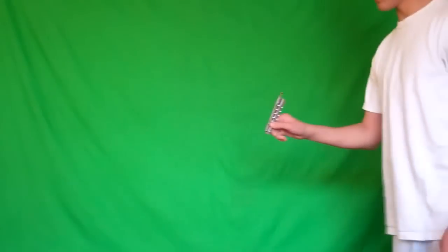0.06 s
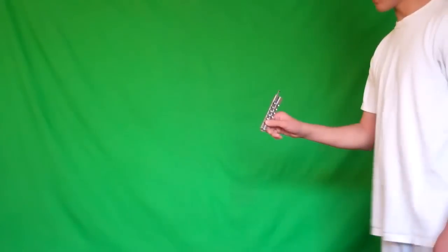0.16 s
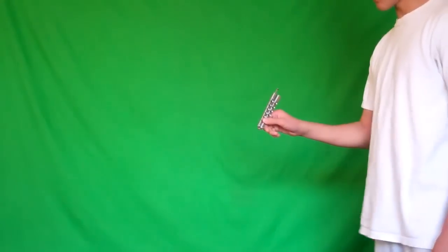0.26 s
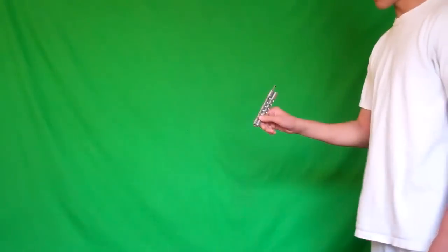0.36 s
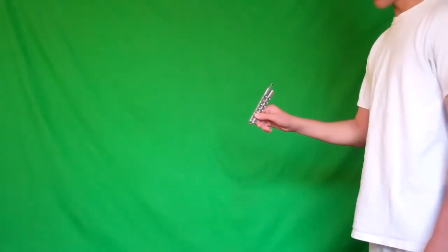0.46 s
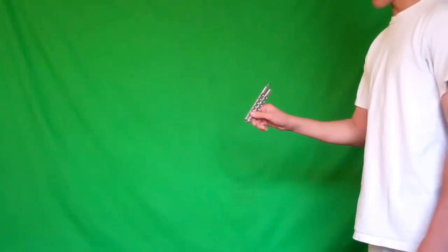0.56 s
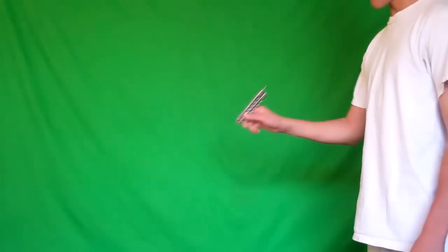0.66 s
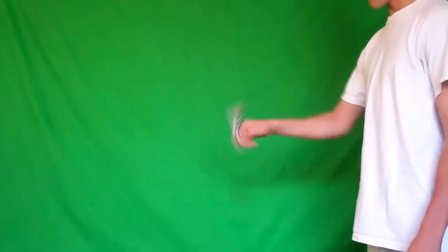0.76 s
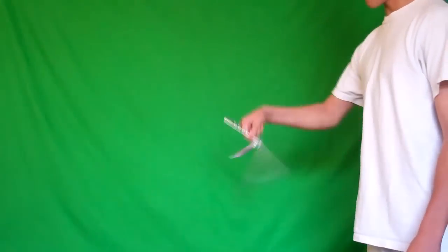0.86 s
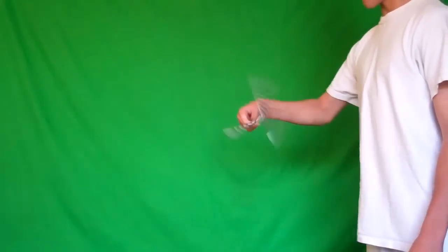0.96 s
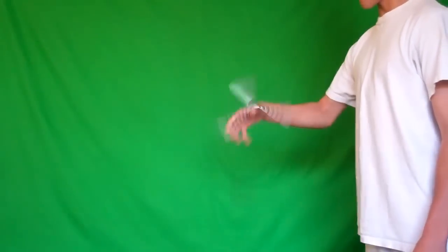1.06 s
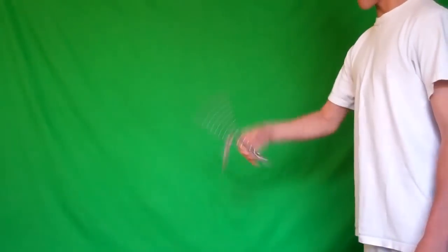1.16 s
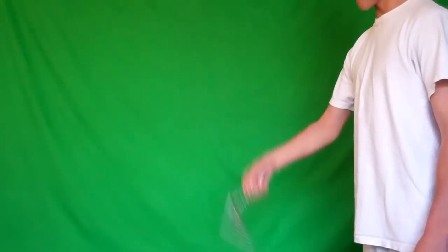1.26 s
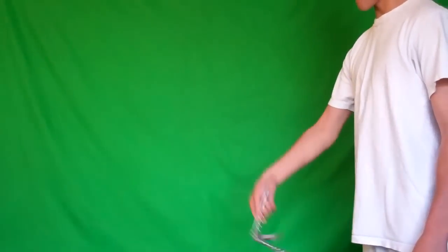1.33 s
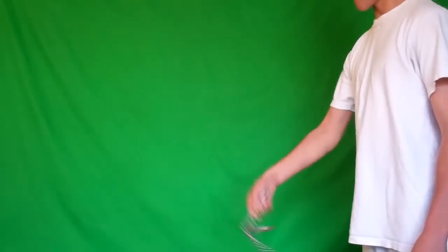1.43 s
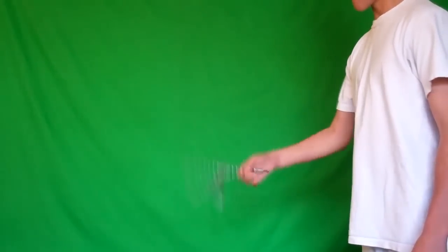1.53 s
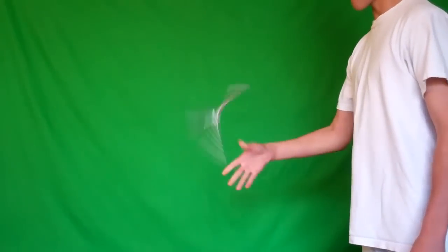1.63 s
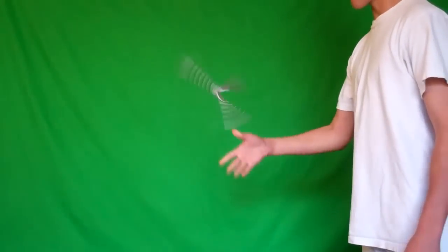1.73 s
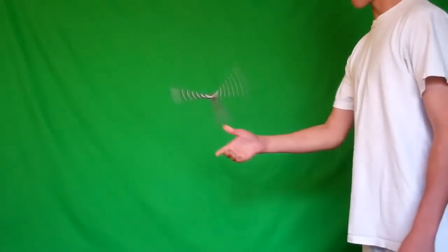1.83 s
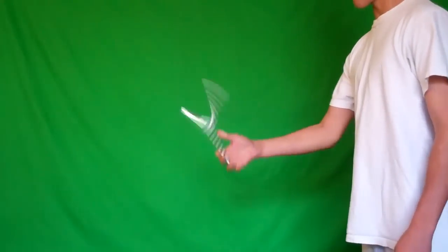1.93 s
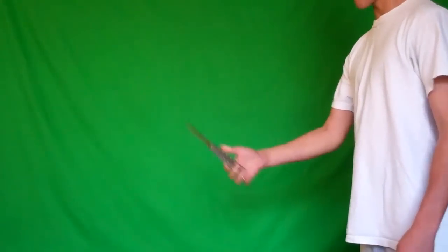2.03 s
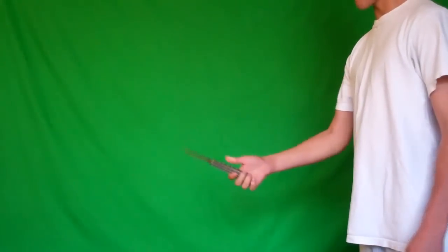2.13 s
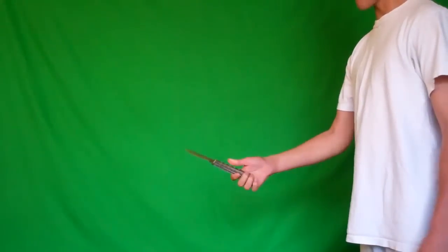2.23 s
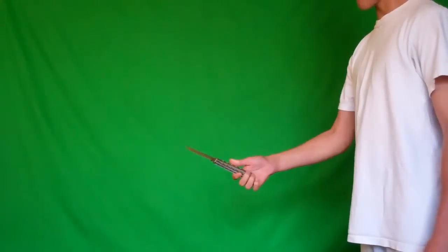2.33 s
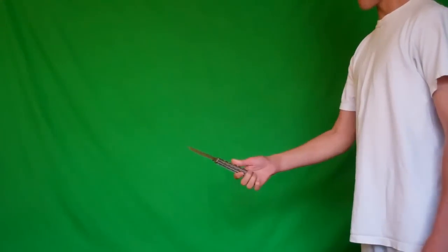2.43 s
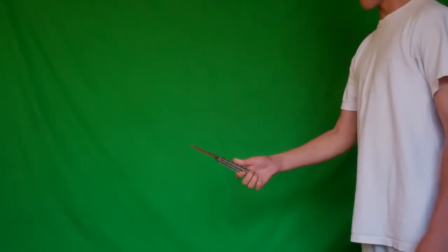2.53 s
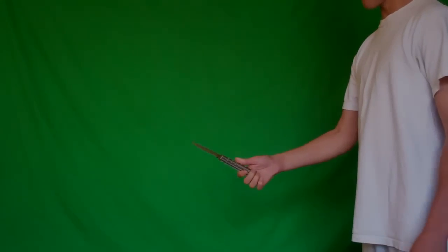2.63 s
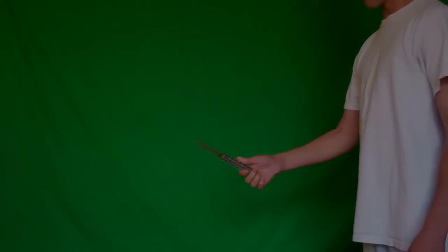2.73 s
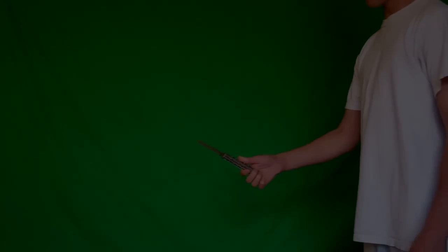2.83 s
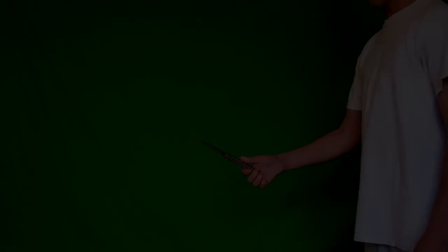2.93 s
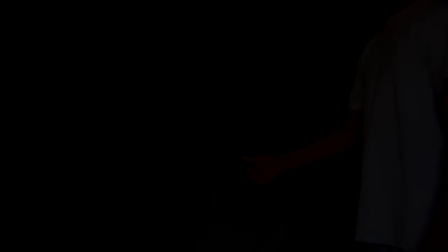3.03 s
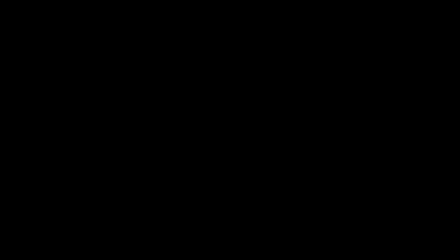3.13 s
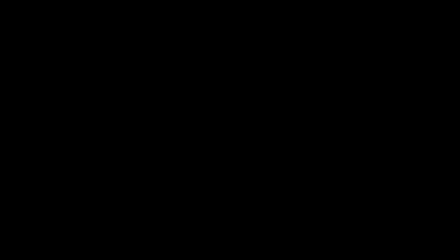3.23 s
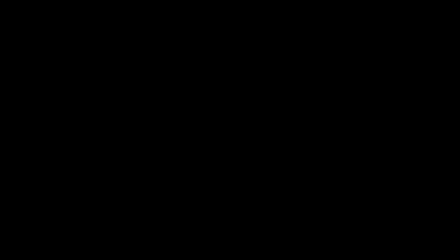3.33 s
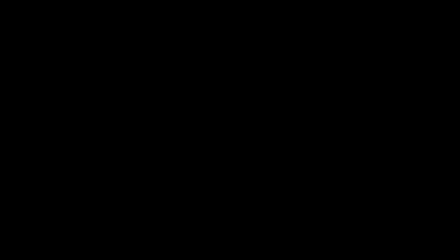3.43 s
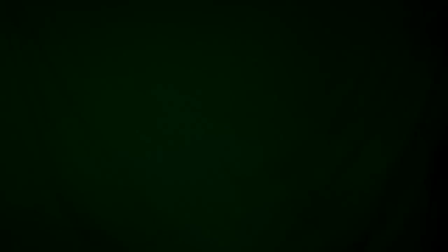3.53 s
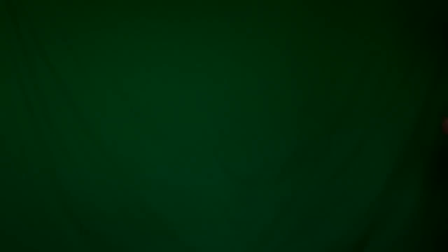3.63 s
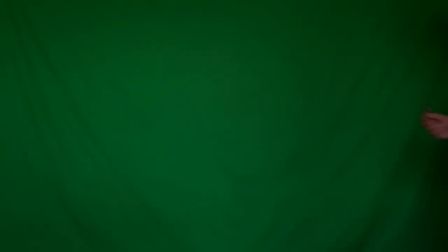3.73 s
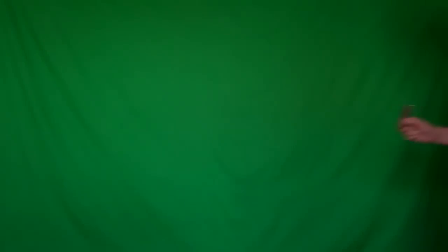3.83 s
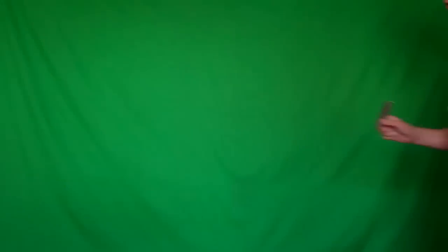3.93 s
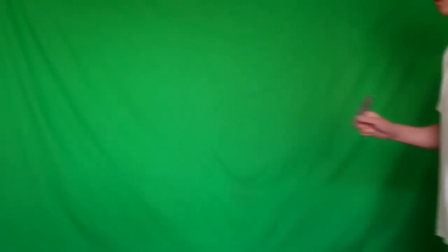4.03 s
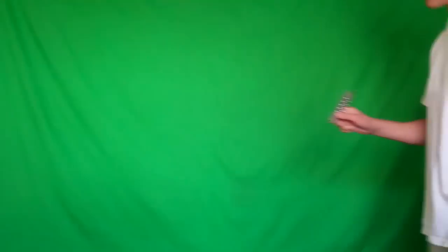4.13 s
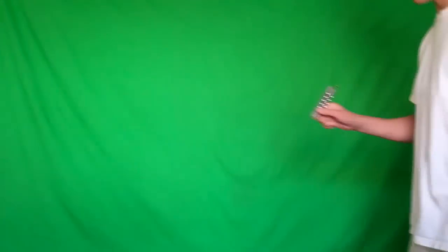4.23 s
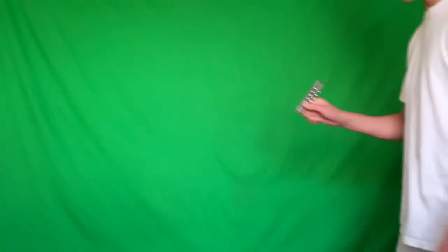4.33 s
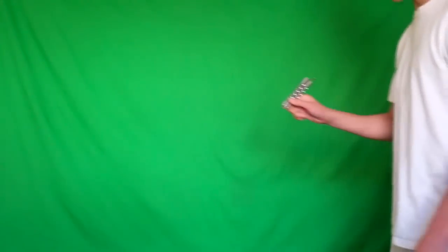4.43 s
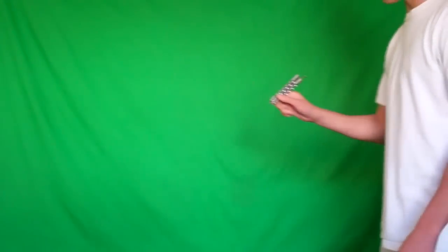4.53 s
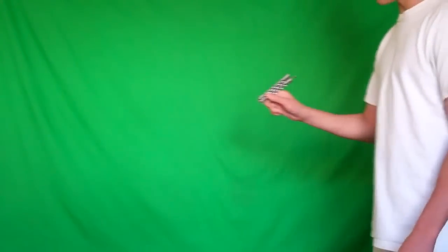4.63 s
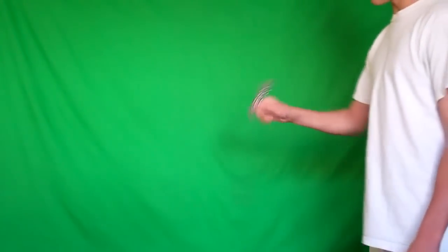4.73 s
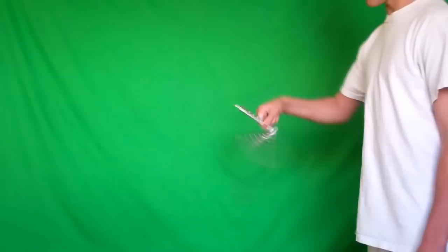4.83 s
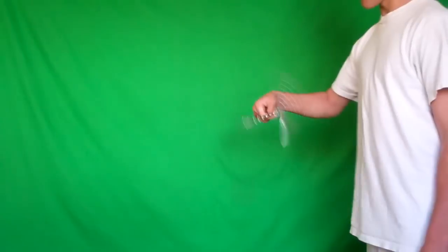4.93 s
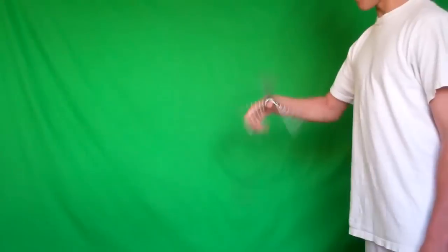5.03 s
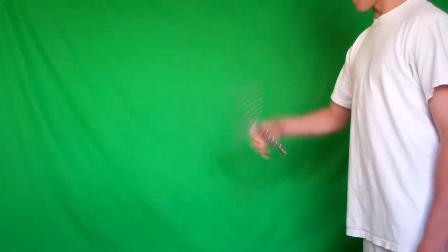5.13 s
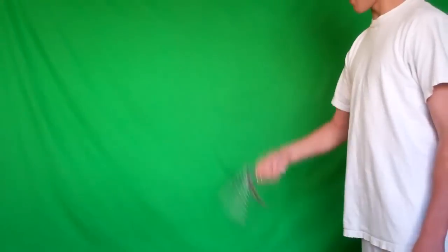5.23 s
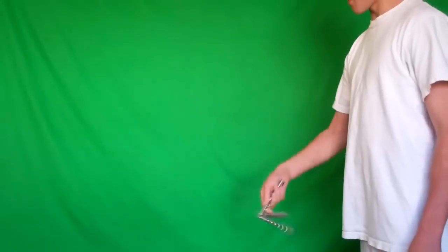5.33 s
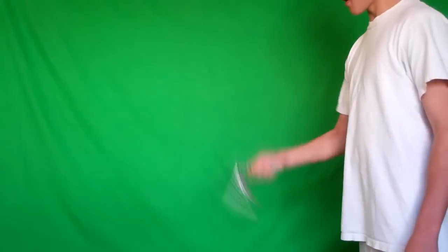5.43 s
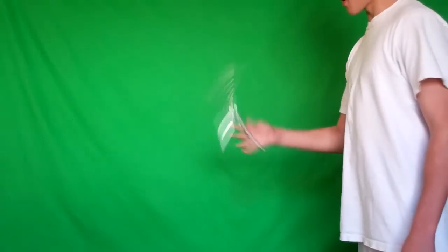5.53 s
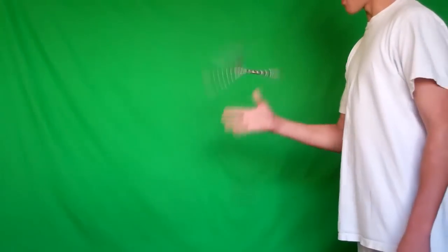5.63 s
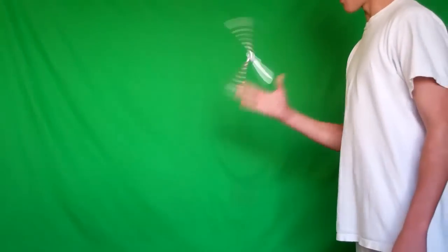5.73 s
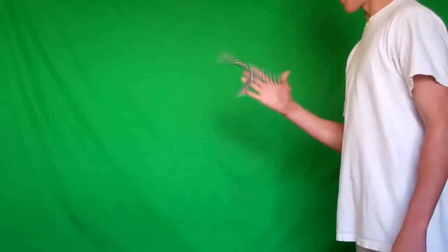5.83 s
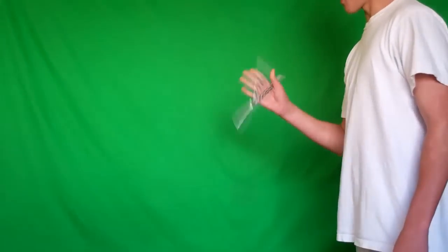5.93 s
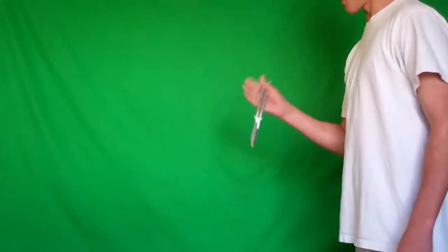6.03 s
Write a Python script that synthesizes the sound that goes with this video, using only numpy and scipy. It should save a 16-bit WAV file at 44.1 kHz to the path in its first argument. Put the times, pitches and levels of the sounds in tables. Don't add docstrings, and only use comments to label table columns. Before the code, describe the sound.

Two quick bursts of sharp, thin metallic clacks and chatter from a hand-flipped steel knife, separated by a hissy pause in a furnished room.

```python
import sys
import numpy as np
from scipy import signal
from scipy.fft import rfft, irfft
from scipy.io import wavfile
from scipy.ndimage import uniform_filter1d

SR = 44100
rng = np.random.default_rng(int(sys.argv[2]) if len(sys.argv) > 2 else 0)


def inscribe(sig):
    pcm = np.round(np.clip(np.atleast_2d(sig).T, -1, 1) * 32767)
    wavfile.write(sys.argv[1], SR, pcm.astype(np.int16))


def voltage_ratio(level):
    return 10 ** (np.asarray(level, float) / 20)


N = 268172

# frequency in Hz, width in Hz, level in dB.
PIN_MODES = [(10420, 700, -6), (11245, 400, 1.5), (11600, 310, -7.5), (12700, 450, 4), (13440, 550, -3),
             (14220, 700, -14)]
# frequency in Hz, width in Hz, level in dB.
BLADE_MODES = [(7050, 700, -10), (7800, 700, -7), (8800, 500, 0), (9480, 700, -4)]
# frequency in Hz, width in Hz, level in dB.
HANDLE_MODES = [(1700, 500, -33), (1950, 600, -27), (2400, 600, -22), (3100, 600, -8), (3750, 600, -5),
                (4500, 800, -8), (5600, 600, 0), (6200, 700, -5)]
# frequency in Hz, width in Hz, level in dB.
PALM_MODES = [(200, 300, -9), (410, 350, -2), (810, 420, -1), (1250, 480, -2)]

# peak in seconds, pin click in dB, blade in dB re click, handles in dB re
# click, loss per bounce in dB.
FIRST_FLIP = [(.8652, -27.5, -7, -10, 12), (.8906, -37, -6, -2, 5), (1.2115, -33, -21, -20, 9),
              (1.2426, -28, -14, -18, 4), (1.3097, -30, -15, -14, 6), (1.3382, -20, -10, -15, 4),
              (1.3532, -20, -7, -15, 5), (1.3635, -20, -12, -20, 8), (1.3746, -29, -9, -16, 12),
              (1.6556, -38, -13, -17, 5), (1.6859, -27, -26, -28, 12), (1.8235, -33, -22, -18, 12),
              (1.8405, -31, -18, -18, 5), (1.8935, -34, -10, -17, 6), (1.9785, -22, -12, -20, 12),
              (1.9805, -15, -11, -24, 5), (2.0192, -30, -5, -24, 12), (2.0414, -17, -11, -18, 15),
              (2.0433, -13, -12, -23, 13), (2.0723, -8, -15, -20, 8), (2.0789, -8, -12, -24, 15),
              (2.0837, -10, -16, -23, 15), (2.0862, -11, -14, -22, 9), (2.0946, -18, -8, -19, 9)]
# peak in seconds, pin click in dB, blade in dB re click, handles in dB re
# click, loss per bounce in dB.
SECOND_FLIP = [(4.7469, -23.5, -10, -10, 12), (4.8122, -21, -4, -7, 12), (4.8196, -28, -6, -8, 8),
               (4.8963, -23, -7, -11, 12), (4.959, -40, -12, -12, 3), (5.2383, -22, -5, -13, 14),
               (5.4493, -15, -4, -8, 15), (5.4551, -23, -9, -15, 5), (5.507, -33, -24, -20, 12),
               (5.5876, -37, -18, -13, 12), (5.6355, -17, -16, -19, 4), (5.6504, -15, -16, -17, 10),
               (5.6639, -26, -8, -11, 7), (5.7462, -37, -10, -16, 12), (5.7749, -39, -14, -19, 3),
               (5.8145, -28, -29, -25, 9), (5.8896, -15, -8, -8, 15), (5.8922, -9, -24, -22, 15),
               (5.8966, -13, -25, -25, 12), (6.0232, -17, -12, -16, 15), (6.0249, -7, -19, -23, 9),
               (6.043, -17, -9, -13, 3)]
# peak in seconds, pin click in dB.
TICKS = [(.6789, -54), (1.1549, -50), (1.2197, -42), (1.2328, -47), (1.4712, -44), (1.478, -45),
         (1.6269, -51), (1.7138, -44), (1.7715, -47), (1.7775, -45), (1.8011, -40), (1.8086, -46),
         (1.9487, -46), (1.9572, -54), (4.9675, -41), (5.145, -46), (5.1944, -42), (5.2611, -42),
         (5.2839, -45), (5.343, -48), (5.6028, -46), (5.6238, -39), (5.8794, -44), (6.0612, -30)]
# start in seconds, thud level in dB.
THUDS = [(1.3097, -62), (1.4712, -60), (1.805, -59), (1.982, -44), (2.0723, -51), (2.0789, -45),
         (4.8122, -50), (5.242, -54), (5.4493, -41), (5.7749, -59), (5.8896, -37), (5.8935, -43),
         (6.0249, -37)]
# time in seconds, left-right difference in dB.
PLACE = [(0, .5), (5.3, 1.0), (5.48, 4), (5.6, .5), (6.1, .5)]
# peak in seconds, level in dB, seconds to rise 20 dB, seconds to fall 20 dB.
SWELLS = [(.893, -42.5, .025, .04), (1.248, -42, .004, .022), (1.345, -32, .006, .07),
          (1.665, -47, .022, .03), (1.71, -50, .03, .12), (1.845, -43, .05, .06), (1.98, -29, .002, .032),
          (2.02, -38, .04, .04), (2.105, -22, .035, .06), (4.962, -44, .008, .05), (4.91, -45, .012, .04),
          (5.15, -54, .008, .08), (5.24, -38, .003, .043), (5.455, -33, .005, .065), (5.66, -35, .03, .04),
          (5.59, -50, .004, .15), (5.78, -50, .01, .06), (5.955, -32, .04, .1), (6.035, -27, .012, .1),
          (6.068, -23, .045, .2)]

# frequency in Hz, 60 dB decay time in seconds.
ROOM_T60 = [(300, 0.067), (1000, 0.28), (2600, 0.32), (8500, 0.31), (11500, .2), (14000, 0.17)]
# delay in seconds, level in dB.
ECHOES = [
    (.0055, -19),
    (.009, -21),
]
# centre in seconds, length in seconds, frequency in Hz, width in Hz, level in dB.
RUSTLES = [(.18, .05, 300, 500, -60), (.17, .04, 1300, 1500, -67), (3.305, .012, 900, 500, -63),
           (3.6, .05, 400, 400, -70), (3.6, .06, 8000, 9000, -68), (1.82, .025, 1050, 200, -62),
           (5.08, .05, 650, 300, -66), (5.68, .02, 1050, 250, -63), (2.12, .05, 1050, 300, -52),
           (5.97, .05, 1050, 300, -59), (4.98, .03, 1500, 1500, -67)]

# frequency in Hz, density in dB per Hz.
HISS = [(12, -24), (20, -15), (55, -14), (77, -19), (113, -4), (144, -9), (496, -12), (958, -14.5),
        (4700, -18.5), (8370, -19), (14100, -14.5)]
# frequency in Hz, left-right likeness from -1 to 1.
LIKENESS = [(60, 0.71), (180, 0.14), (540, 0.14), (1640, 0), (4940, -0.0), (14900, 0.012)]
# frequency in Hz, width in Hz, level in dB rms.
HUM = [(50, 10, -75.5), (120.9, 19, -80.5)]
# frequency in Hz, level in dB.
WHINE = [(11807, -76), (14002, -88), (7881, -90)]
# start in seconds, depth in dB, attack in seconds, hold in seconds.
OVERLOADS = [
    (2.075, 13, .05, .2),
    (5.455, 4, .02, .01),
    (5.897, 4, .006, .005),
    (6.025, 14, .035, .1),
]


def rms_one(x):
    return x / np.sqrt(np.mean(x ** 2) + 1e-20)


def at_hz(points, hz):
    table_hz, values = np.transpose(points)
    return np.interp(np.log(hz), np.log(table_hz), values)


def resonate(x, hz, width_hz):
    radius = np.exp(-np.pi * width_hz / SR)
    angle = 2 * np.pi * hz / SR
    return signal.lfilter([0, np.sin(angle)], [1, -2 * radius * np.cos(angle), radius ** 2], x + 1e-18)


def knife():
    s, click_db, blade_db, handle_db = contacts().T
    free_db = np.minimum(.8 * blade_db - 5, -9)
    rings, peak_at = blows(PIN_MODES, .0003, free_db)
    rings += voltage_ratio(blade_db)[:, None] * blows(BLADE_MODES, .00018, free_db)[0]
    rings += voltage_ratio(handle_db)[:, None] * blows(HANDLE_MODES, .00018, free_db)[0]
    clacks = place(s, click_db, rings, peak_at)
    thud_s, thud_db = np.transpose(THUDS)
    thuds, thud_peak_at = blows(PALM_MODES, .00022, np.full(len(THUDS), -50.))
    return clacks + place(thud_s + .0008, thud_db, thuds, thud_peak_at) + chatter()


def contacts():
    clacks = np.vstack([FIRST_FLIP, SECOND_FLIP])
    s, click_db, blade_db, handle_db, loss_db = clacks.T
    bounce_s, spread, colour_db = .0042, .25, 3
    uneven = rng.standard_normal((len(clacks), 3)).clip(-2, 2)
    gaps = bounce_s * np.cumsum(1 + spread * uneven, axis=1)
    colour = colour_db * rng.standard_normal((len(clacks), 3))
    bounces = []
    for k in range(3):
        bounces.append(np.c_[s + gaps[:, k], click_db - (k + 1) * loss_db, blade_db + colour[:, k], handle_db])
    ticks = [(tick_s, db, -9, -12) for tick_s, db in TICKS]
    run_start_s, run_gap_s, run_db, run_arch_db = 5.92, .0098, -23, 6
    run = []
    for k, along in enumerate(np.linspace(-1, 1, 11)):
        tick_s = run_start_s + run_gap_s * (k + .1 * rng.standard_normal())
        run.append((tick_s, run_db - run_arch_db * along ** 2, -7, -20))
    return np.vstack([clacks[:, :4], *bounces, ticks, run])


def blows(modes, scrape_s, ring_on_db):
    count = len(ring_on_db)
    t, rings = np.arange(1300) / SR, 0
    for hz, width_hz, db in modes:
        swell, shift = rng.standard_normal((count, 2, 1)).transpose(1, 0, 2)
        damped = np.exp(-np.pi * width_hz * t)
        undamped = voltage_ratio(ring_on_db + db)[:, None] * np.exp(-t / .0035)
        sine = np.sin(2 * np.pi * hz * (1 + .02 * shift) * t)
        rings = rings + voltage_ratio(db + 2.2 * swell) * (damped + undamped) * sine
    grit = t[:200] * np.exp(-t[:200] / scrape_s) * rng.standard_normal((count, 200)) ** 3
    rings = signal.fftconvolve(rings, grit, axes=1)[:, :len(t)]
    edges = [.9 * modes[0][0], 1.06 * modes[-1][0]]
    rings = signal.sosfilt(signal.butter(3, edges, "band", fs=SR, output="sos"), rings)
    power = uniform_filter1d(2 * rings ** 2, 66, mode="constant")
    return rings / np.sqrt(power.max(axis=1, keepdims=True)), power.argmax(axis=1)


def place(s, db, rings, peak_at):
    at = (np.round(s * SR).astype(int) - peak_at)[:, None] + np.arange(rings.shape[1])
    out = np.zeros((2, N + rings.shape[1]))
    pan_db = np.interp(s, *np.transpose(PLACE))
    for side, sign in enumerate((.5, -.5)):
        np.add.at(out[side], at, voltage_ratio(db + sign * pan_db)[:, None] * rings)
    return out[:, :N]


def chatter():
    t, level = np.arange(N) / SR, np.zeros(N)
    for s, db, rise, fall in SWELLS:
        level += voltage_ratio(db - 20 * np.maximum((s - t) / rise, (t - s) / fall))
    sizes = voltage_ratio(3 * np.minimum(rng.exponential(1, N), 4)) * rng.choice([-1, 1], N)
    ticks = level * rms_one(sizes * (rng.random(N) < 2000 / SR))
    rings = np.zeros(N)
    for modes, part_db in [(PIN_MODES, -18), (BLADE_MODES, -20), (HANDLE_MODES, -28.5)]:
        for hz, width_hz, db in modes:
            rings += resonate(voltage_ratio(db + part_db) * ticks, hz, width_hz)
    return signal.sosfilt(signal.butter(3, 2600, "high", fs=SR, output="sos"), rings)


def room(build_s):
    t = np.arange(SR // 2) / SR
    tail, edges = 0, 200 * 2 ** np.arange(0, 6.6, .5)
    for low, high in zip(edges, edges[1:]):
        band_pass = signal.butter(2, [low, high], "band", fs=SR, output="sos")
        band = signal.sosfilt(band_pass, rng.standard_normal((2, len(t))))
        tail = tail + band * voltage_ratio(-60 * t / at_hz(ROOM_T60, np.sqrt(low * high)))
    tail = tail[0] + .95 * tail[1] * np.array([[1], [-1]])
    tail = voltage_ratio(-30.5) * tail * (1 - np.exp(-(t / build_s) ** 2))
    for delay, db in ECHOES:
        tail[[0, 1], round(delay * SR) + rng.integers(0, 12, 2)] += voltage_ratio(db)
    return tail


def reverberate(x, response):
    return signal.fftconvolve(x, response, axes=-1)[..., :N]


def rustles():
    t, out = np.arange(N) / SR, np.zeros(N)
    for s, length, hz, width_hz, db in RUSTLES:
        noise = rms_one(resonate(rng.standard_normal(N), hz, width_hz))
        out += voltage_ratio(db - 10 * ((t - s) / length) ** 2) * noise
    return out


def background():
    hz = np.maximum(np.arange(N // 2 + 1) * SR / N, 10)
    alike = np.clip(at_hz(LIKENESS, hz), -1, 1)
    mid, side = rfft(rng.standard_normal((2, N))) * voltage_ratio(at_hz(HISS, hz))
    pair = np.sqrt(1 + alike) * mid + np.sqrt(1 - alike) * side * [[1], [-1]]
    hiss_db = -58
    out = voltage_ratio(hiss_db + 4.5) * rms_one(irfft(pair, N))
    for line_hz, width_hz, db in HUM:
        out += voltage_ratio(db) * rms_one(resonate(rng.standard_normal(N), line_hz, width_hz))
    for line_hz, db in WHINE:
        out += voltage_ratio(db + 5) * np.sin(2 * np.pi * line_hz * np.arange(N) / SR)
    return out


def ducking():
    t, gain_db = np.arange(N) / SR, np.zeros(N)
    release_db_per_s = 62
    for s, depth_db, attack, hold in OVERLOADS:
        corners = np.cumsum([0, attack, hold, depth_db / release_db_per_s])
        gain_db -= np.interp(t - s, corners, [0, depth_db, depth_db, 0])
    return voltage_ratio(gain_db)


def scene():
    steel = knife()
    reverberation = reverberate(np.mean(steel, axis=0, keepdims=True), room(build_s=.004))
    return steel + reverberation + rustles() + background()


def band_limit(x):
    return signal.sosfilt(signal.butter(12, 15470, fs=SR, output="sos"), x)


def record(dry):
    ducked = dry * ducking()
    low_pass = signal.ellip(8, .5, 42, 14250, fs=SR, output="sos")
    return band_limit(signal.sosfilt(low_pass, ducked))


dry = scene()
out = record(dry)
inscribe(out)
```